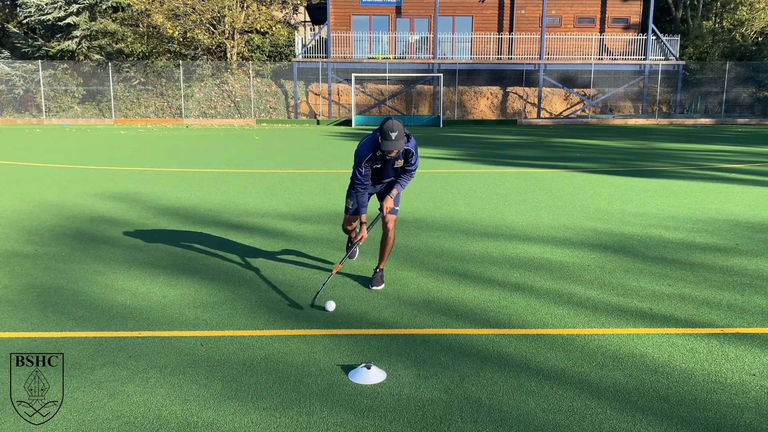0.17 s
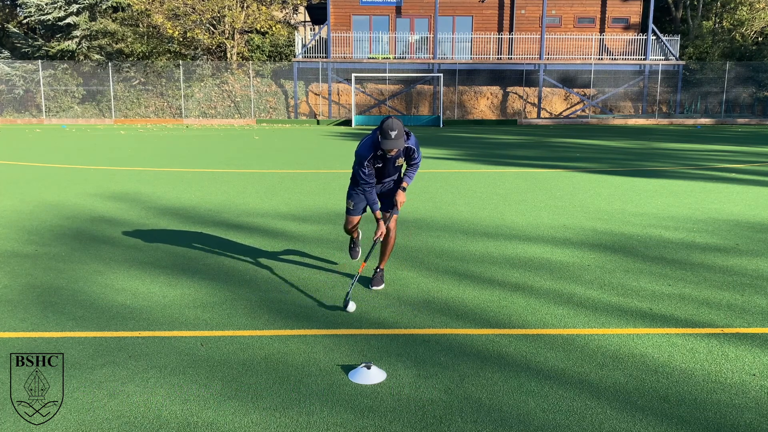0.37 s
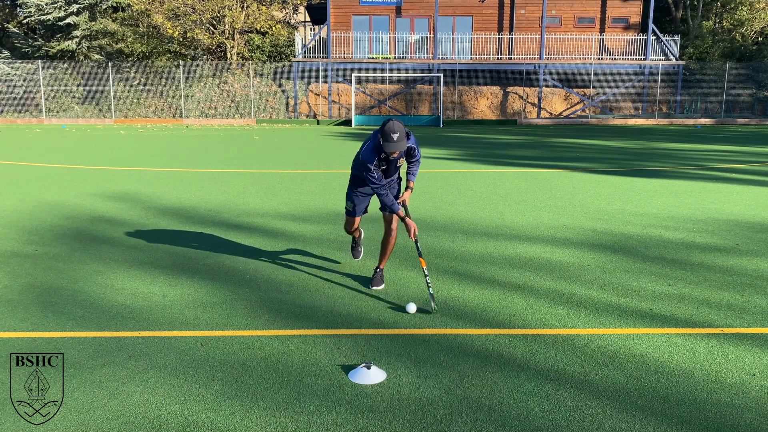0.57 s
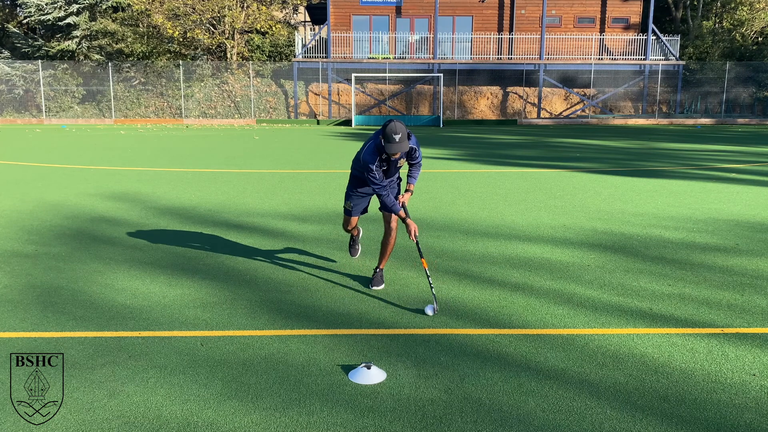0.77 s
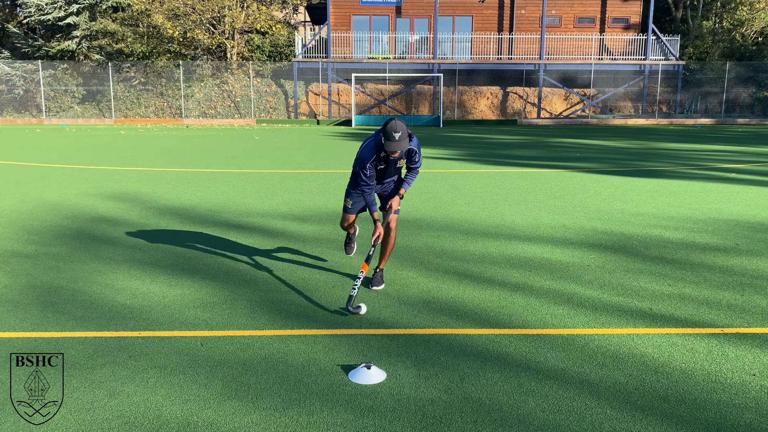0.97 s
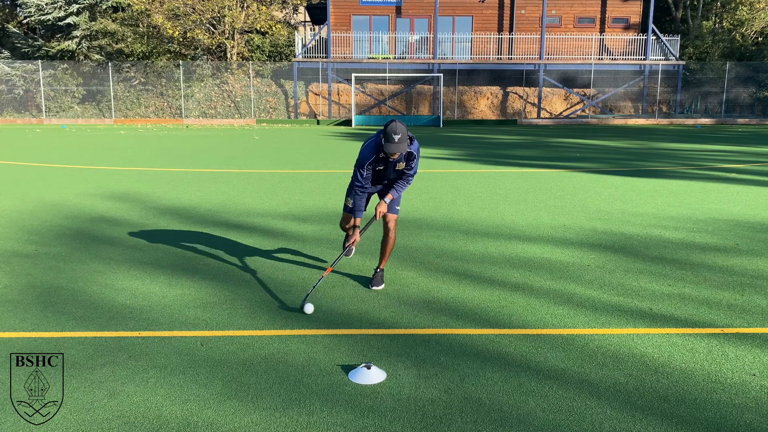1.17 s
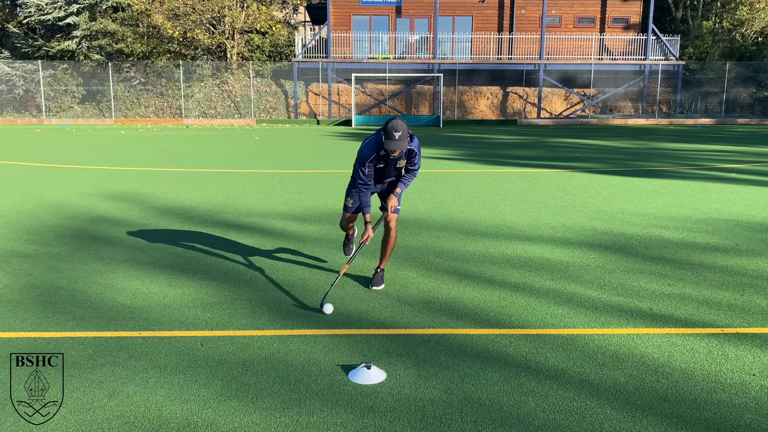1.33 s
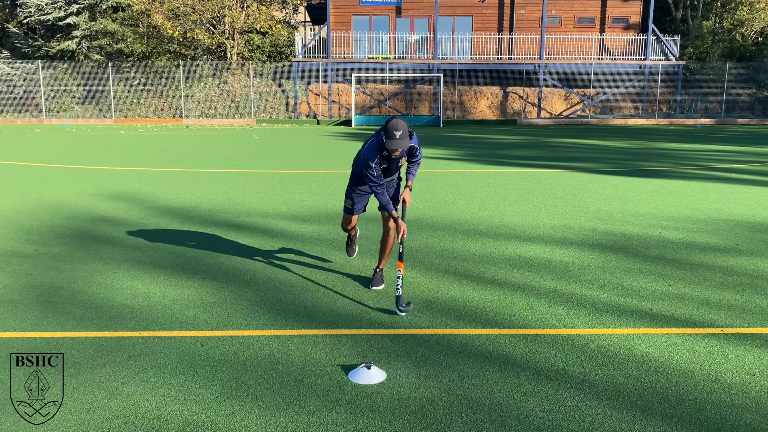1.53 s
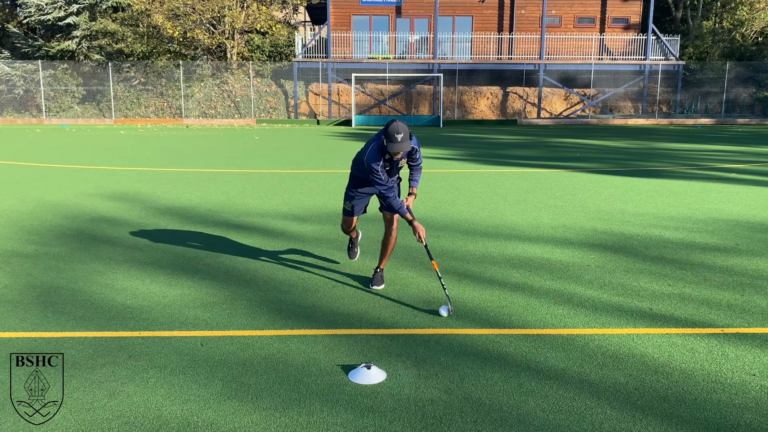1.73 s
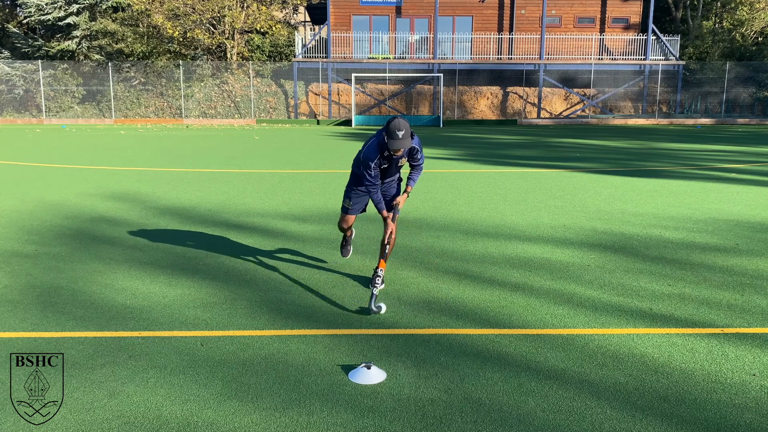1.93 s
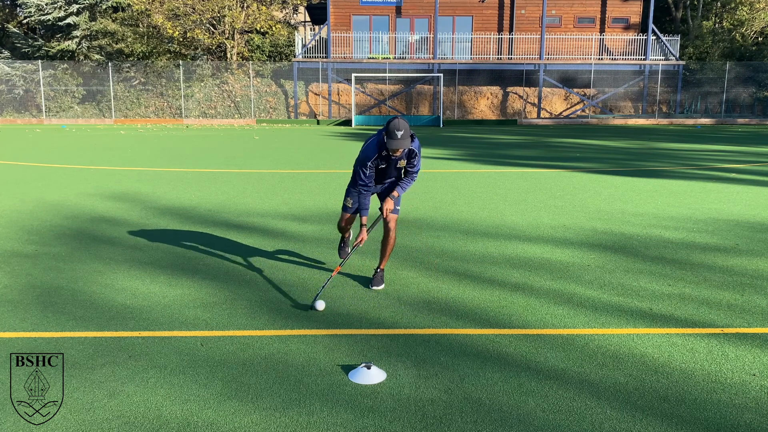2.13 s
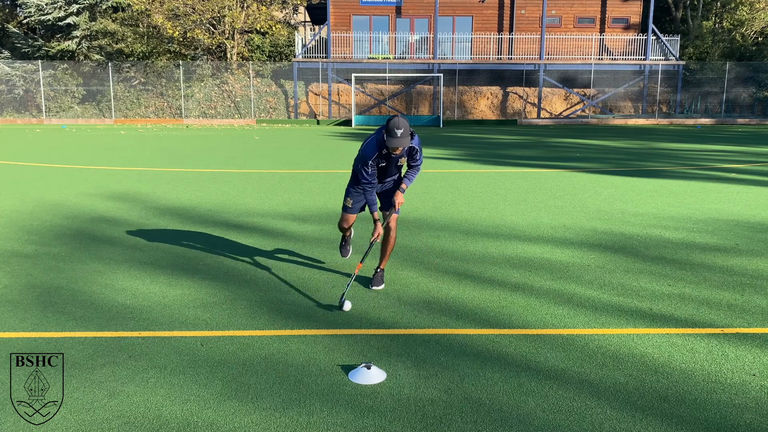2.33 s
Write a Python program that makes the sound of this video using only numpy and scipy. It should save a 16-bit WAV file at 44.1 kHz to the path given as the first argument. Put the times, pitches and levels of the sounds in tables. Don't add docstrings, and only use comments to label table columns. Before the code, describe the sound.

Short, dry wooden knocks on a hard ball, alternating with quieter ticks and thuds and brief turf brushing, heard by a phone a few metres away on an open pitch, with slap echoes and a faint steady hum.

```python
import sys
import numpy as np
from scipy import signal
from scipy.fft import rfft, irfft
from scipy.io import wavfile
from scipy.ndimage import uniform_filter1d

SR = 44100
rng = np.random.default_rng(int(sys.argv[2]) if len(sys.argv) > 2 else 0)


def voltage_ratio(decibels):
    exponent = np.asarray(decibels, float) / 20
    return 10 ** exponent


def unload_audio(sound):
    columns = np.transpose(np.atleast_2d(sound))
    steps = np.round(np.clip(columns, -1, 1) * 32767)
    wavfile.write(sys.argv[1], SR, steps.astype(np.int16))


N = 110250
T = np.arange(N) / SR
F = np.fft.rfftfreq(N, 1 / SR) + 1e-3

# pitch_hz, level_db_per_hz
TRAFFIC_COLOUR = [(30, -4), (60, -3), (200, -7.5), (550, -13.5), (1400, -10.5), (2750, -46), (7000, -55.5),
                  (16000, -72)]
# pitch_hz, likeness_0_to_1
EAR_LIKENESS = [(60, 0.9), (130, 0.57), (290, 0.55), (640, 0), (1410, 0), (3100, 0), (6820, -0.01),
                (15000, 1)]
# pitch_hz, level_db, wobble_db
HUMS = [(58, -56.5, 3.5), (546, -62.5, .8)]
# time_s, level_db
HISS_LEVEL = [(0.0, -88), (0.2, -94), (0.26, -80), (0.4, -71.5), (0.55, -84.5), (0.62, -105),
              (0.7, -79.5), (0.95, -78), (1.07, -86), (1.17, -98), (1.24, -79), (1.5, -74.5), (1.64, -89),
              (1.74, -79), (2.02, -80.5), (2.14, -97), (2.24, -76), (2.5, -83)]
# pitch_hz, width_hz, level_db
HISS_BANDS = [(10600, 2800, 5), (15000, 1400, 0.5)]
# time_s, level_db
BRUSH_LEVEL = [(0, -59), (.15, -70), (.29, -70.5), (.33, -51), (.6, -83), (.82, -66), (.85, -48.5),
               (1.0, -65), (1.13, -91), (1.44, -71), (1.48, -48.5), (1.58, -53), (1.75, -71.5),
               (1.9, -78.5), (2.1, -68.5), (2.15, -54), (2.3, -70), (2.5, -86)]
# pitch_hz, level_db_per_hz
FIBRE_COLOUR = [(400, -30), (900, -3.5), (1800, 2.5), (2800, -1.5), (5000, -2), (7300, -8), (8300, -27.5),
                (16000, -43)]
# start_s, peak_db, pitch_hz, decay_60db_s
SMALL_RINGS = [(.016, -48.5, 2060, 0.046), (.043, -43.5, 2020, 0.057), (.065, -43.5, 2200, 0.021),
               (.2505, -31, 1260, .008), (.296, -42, 1400, 0.0076), (.337, -21, 1030, 0.0065),
               (.407, -26, 1130, 0.0079), (.788, -32, 2240, 0.0077), (.908, -37, 1300, .01),
               (1.4785, -28, 3500, 0.0035), (1.4785, -29, 6400, 0.0039), (2.139, -27, 2250, 0.005),
               (2.139, -29, 3570, 0.0046), (2.3, -38, 1500, .004), (1.3855, -29, 860, 0.011),
               (1.4035, -39, 5900, .004), (.7645, -21, 2000, 0.0066), (.227, -27, 1700, .012),
               (.2955, -30.5, 800, 0.0099), (.945, -30, 1410, .005), (.9555, -36, 2400, 0.0048),
               (0.295, -28, 1000, 0.011), (.836, -30, 1170, 0.014), (.881, -35, 1270, 0.024),
               (2.0478, -34, 1380, 0.012), (1.529, -32.5, 1550, 0.033), (1.557, -32.5, 1700, 0.01),
               (1.566, -35.5, 1650, 0.02), (1.3845, -23.5, 1330, 0.017), (2.065, -33, 1450, 0.023),
               (2.052, -42, 2040, 0.085), (2.150, -28.5, 1920, 0.02), (2.192, -36, 2020, 0.064),
               (2.150, -40.5, 2020, 0.15), (2.228, -37, 1060, 0.02), (2.265, -48.5, 2020, 0.054)]
# start_s, peak_db, centre_hz, length_s
TURF_SCUFFS = [(0.042, -40, 1930, 0.0071), (0.946, -29.5, 2790, 0.0094), (1.404, -26.5, 2260, 0.0065),
               (1.405, -27.5, 4300, 0.0024), (1.452, -36, 2986, 0.0077), (1.469, -29.5, 3735, 0.0025),
               (1.4775, -20.5, 3670, 0.0022), (1.469, -30.5, 6600, 0.0026), (2.113, -40, 5800, 0.0025),
               (1.452, -39, 7000, .004), (1.527, -20.5, 1600, 0.0023), (1.530, -24, 3500, 0.013),
               (1.555, -25, 1900, .004), (1.564, -30.5, 1670, 0.0048), (1.842, -46, 3500, 0.01),
               (2.0465, -20.5, 3500, 0.0021), (2.05, -31.5, 580, 0.031), (1.614, -37, 800, 0.0036),
               (2.111, -35, 2860, 0.0042), (2.130, -30, 3600, 0.00098), (2.137, -26, 2830, 0.0015),
               (2.152, -32, 1500, 0.00075), (2.191, -26, 1370, 0.0047)]
# start_s, peak_db, shaft_hz, tick_db, thud_db
LIGHT_TOUCHES = [
    (0.1734, -23.5, 800, -21.5, -2.5),
    (0.6604, -20, 770, -20, -8.5),
    (1.111, -22, 860, -27.5, -10.5),
    (1.614, -36, 790, -18.5, 1.5),
    (2.088, -26, 905, -28, -11),
]
# thud_decay_60db_s, crunch_db, crunch_hz, tap_db
TOUCH_GRIPS = [(0.015, 2, 2870, 1.5), (0.025, .3, 1980, 2.5), (0.019, -0.4, 2250, -5), (0.017, -2, 1900, 2),
               (0.017, 2.3, 2600, -0.5)]
# pitch_hz, level_db, decay_60db_s
TICK_MODES = [(7260, -15, 0.0011), (11000, 4, 0.0011), (15500, -5.5, 0.0027)]
# start_s, peak_db, body_tilt_db, ball_ring_db, sharp_edge_db
HARD_KNOCKS = [
    (.222, 0.5, -1, -17, -31),
    (0.2322, -22.5, -8, -16, -46),
    (0.235, -38, -13, -9, -36),
    (.762, 0, 5.5, -20, -41),
    (.770, -24, 3, -21, -52),
    (.774, -33, -9.5, -15, -60),
    (1.3814, -7.5, -0.5, -23, -67),
    (2.046, -18, -4.5, -30, -61),
]
# middle_body_mode_db, body_pitch_ratio, ball_pitch_ratio, thump_db, edge_pitch_ratio
KNOCK_PLACES = [(5, 1.029, 1.045, 1.5, 1.02), (4, 1.02, 1.05, 1, 1.04), (8, 1.01, 0.93, 0.5, 1.01),
                (1, 1.044, 1.007, -1, 1.14), (6, 0.89, 1.2, 1, 1.1), (7, 0.96, 0.96, .3, 1.1),
                (1.5, 1.01, 1.035, 3.5, 1.1), (1, 0.965, 0.82, 1, 1.01)]
# pitch_hz, level_db, decay_60db_s
WOOD_MODES = [(1044, -3.5, 0.0037), (1446, -2.5, 0.0037), (1995, -4, 0.0046)]
# pitch_hz, level_db, decay_60db_s
BALL_MODES = [(3500, -10.5, 0.00274), (4560, 5, 0.0016), (6370, -1, 0.0023)]
# pitch_hz, level_db, decay_60db_s
EDGE_MODES = [(10270, -5.5, 0.002), (12400, -22, 0.00088), (15040, -23, 0.0018)]
# delay_s, slap_db, scatter_db, spread_s
WALL_ECHOES = [(0.072, -26, -31, 0.0037), (.092, -50, -33.5, .004), (.115, -28, -30, .012),
               (0.167, -20, -40.5, .003), (.176, -24.5, -31, .003), (.185, -24.5, -30.5, .006)]
# pitch_hz, level_db
ECHO_COLOUR = [(400, 5), (1000, -1), (2000, -2), (3300, 4.5), (5000, -0.5), (8000, 2)]
# pitch_hz, difference_db
PORT_LEVEL = [(200, 0), (700, -1), (1400, .5), (2800, 2), (5600, 7), (9000, 1.5), (14000, 0)]
# pitch_hz, phase_rad
PORT_TURN = [(300, .5), (1500, .4), (2700, .4), (5000, .5), (9000, .35), (12500, 2), (16000, 2.2)]
# pitch_hz, level_db
MIC_COLOUR = [(22, -16), (45, 3), (7600, -0.5), (9100, -9.5), (10500, -3), (12300, -3.5), (13400, -10),
              (15000, -2.5), (15800, -10), (16500, -9)]


def read(table, hz):
    pitch, value = np.array(table).T[:2]
    return np.interp(np.log(hz), np.log(pitch), value)


def follow(table):
    return np.interp(T, *np.array(table).T)


def unit(x):
    return x / np.sqrt(np.mean(x ** 2))


def band(x, hz, width):
    return signal.lfilter(*signal.iirpeak(hz, hz / width, fs=SR), x)


def butter(x, order, hz, kind="low"):
    return signal.sosfilt(signal.butter(order, hz, kind, fs=SR, output="sos"), x)


def walk(rate):
    hold = int(SR / rate)
    steps = np.repeat(rng.standard_normal(N // hold + 1), hold)
    return 1.056 * uniform_filter1d(uniform_filter1d(steps, hold), hold)[:N]


def ring(t, hz, t60):
    contact_cycles = 0.96
    t = np.maximum(t, 0)
    push = 1 - np.exp(-(t * hz / contact_cycles) ** 2)
    return push * np.sin(2 * np.pi * hz * t) * voltage_ratio(-60 * t / t60)


def chord(t, modes, ratio=1):
    return sum(voltage_ratio(db) * ring(t, hz * ratio, t60) for hz, db, t60 in modes)


def burst(t, hz, width, t60):
    noise, grain = rng.standard_normal((2, SR // 10))[:, :len(t)]
    gain = np.std(band(band(noise, hz, width), hz, width))
    fading = noise * grain * voltage_ratio(-60 * np.abs(t) / t60) * (t > 0)
    return band(band(fading, hz, width), hz, width) / gain


def add(out, at, shape):
    i = int(at * SR)
    part = out[i:i + SR // 10]
    part += shape(T[i:i + len(part)] - at)


def town():
    traffic_db = -44.5
    traffic, swell = 0, walk(0.85)
    for hz in 32 * 2 ** np.arange(0, 9.1, .5):
        width = hz / 1.77
        like = np.sqrt(np.clip(read(EAR_LIKENESS, hz), 0, .99))
        mid, side = (unit(band(band(rng.standard_normal(N), hz, width), hz, width)) for _ in range(2))
        db = read(TRAFFIC_COLOUR, hz) + 10 * np.log10(hz) + 1.8 * swell + 0.68 * walk(4.3)
        ears = np.sqrt(1 + like) * mid + np.sqrt(1 - like) * side * np.array([[1], [-1]])
        traffic = traffic + voltage_ratio(db) * ears
    hum = 0
    for hz, db, wobble_db in HUMS:
        level = voltage_ratio(db - 1 + wobble_db * walk(6.92))
        drifting_hz = hz + 1.45 * walk(6.46)
        hum = hum + level * np.sin(2 * np.pi * np.cumsum(drifting_hz) / SR)
    return unit(traffic) * voltage_ratio(traffic_db - 5.0) + hum


def high_hiss():
    noise = rng.standard_normal((2, N))
    airy = 0
    for hz, width, db in HISS_BANDS:
        part = butter(noise, 3, [hz - width / 2, hz + width / 2], "band")
        airy = airy + voltage_ratio(db) * part * np.sqrt(SR / 2 / width)
    return airy * voltage_ratio(follow(HISS_LEVEL) + 1.43 * walk(17))


def brush():
    brush_db, grains_per_s, scatter_db = -6, 3800, 1
    chance, height, size = rng.random((3, N))
    clicks = (chance < grains_per_s / SR) * (height - .5) * voltage_ratio(-scatter_db * np.log(size + 1e-9))
    rough = unit(clicks) + 1.9 * rng.standard_normal(N)
    hiss = irfft(rfft(rough) * voltage_ratio(read(FIBRE_COLOUR, F)), N)
    hiss /= np.std(band(hiss, 5900, 3400))
    return hiss * voltage_ratio(follow(BRUSH_LEVEL) + brush_db + 1.5 * walk(36.0))


def rings():
    out = np.zeros(N)
    for at, db, hz, t60 in SMALL_RINGS:
        add(out, at, lambda t: voltage_ratio(db) * (ring(t, hz, t60) + 1.1 * ring(t, hz * 0.886, t60 * 0.3)))
    return out


def scuffs():
    gain_db, hiss_db = -0.5, -21
    out = np.zeros(N)
    for at, db, hz, length in TURF_SCUFFS:
        t60 = 5 * max(length, .001)

        def scrape(t):
            body = 0.24 * burst(t, hz, hz / 1.23, t60)
            hiss = voltage_ratio(hiss_db) * burst(t, 2280, 2000, t60)
            return voltage_ratio(db + gain_db) * (body + hiss)
        add(out, at, scrape)
    return out


def touches():
    touch_gain_db, tick_gain_db = 2.5, 18.5
    tap_hz, tap_gain_db, tap_t60_s = 1500, 5.5, 0.0033
    crunch_gain_db, crunch_s = -16, 0.0032
    out = np.zeros(N)
    for (at, db, hz, tick_db, thud_db), grip in zip(LIGHT_TOUCHES, TOUCH_GRIPS):
        thud_t60, crunch_db, crunch_hz, tap_db = grip

        def touch(t):
            tap = -voltage_ratio(tap_gain_db + tap_db) * ring(t, tap_hz, tap_t60_s)
            thud = 0.75 * ring(t - .0025, hz, thud_t60) + 0.4 * burst(t - .002, hz, 740, 0.028)
            tick = chord(t - .0005, TICK_MODES) + 0.09 * burst(t, 9100, 5500, 0.017)
            crunch = voltage_ratio(crunch_gain_db + crunch_db) * burst(t, crunch_hz, 1320, crunch_s * 5)
            hit = tap + voltage_ratio(thud_db) * thud + voltage_ratio(tick_db + tick_gain_db) * tick + crunch
            return voltage_ratio(db + touch_gain_db) * hit
        add(out, at, touch)
    return out


def knocks():
    knock_gain_db, ball_gain_db, edge_gain_db = 6.5, 7, 20.5
    thump_hz, thump_gain_db, thump_t60_s = 612, -9.5, 0.0043
    rattle_db, rattle_t60_s = -29, 0.028
    ball_late_s, wood_top_hz = 0.000338, 2565
    wood, ball = np.zeros(N), np.zeros(N)
    for (at, db, tilt_db, ball_db, edge_db), place in zip(HARD_KNOCKS, KNOCK_PLACES):
        mid_db, pitch, bright, thump_db, sharp = place
        level = voltage_ratio(db + knock_gain_db)

        def wooden(t):
            body = 0
            for k, (hz, mode_db, t60) in enumerate(WOOD_MODES):
                mode_db = mode_db + (k - 1.5) * tilt_db + (k == 1) * mid_db
                body = body + (-1) ** k * voltage_ratio(mode_db) * ring(t, hz * pitch, t60)
            return level * (body - voltage_ratio(thump_gain_db + thump_db) * ring(t, thump_hz, thump_t60_s))

        def hard(t):
            late = t - ball_late_s
            tone = voltage_ratio(ball_db + ball_gain_db) * chord(late, BALL_MODES, bright)
            edge = voltage_ratio(edge_db + edge_gain_db) * chord(late, EDGE_MODES, sharp)
            rattle = burst(t, 1390, 2720, rattle_t60_s) + 0.12 * burst(t, 4800, 5000, 0.019)
            return level * (tone + edge + voltage_ratio(rattle_db) * rattle)
        add(wood, at, wooden)
        add(ball, at, hard)
    return butter(wood, 3, wood_top_hz) + ball


def yard(x):
    slap_top_hz, echo_top_hz = 2400, 6500
    tail_start_s, tail_rise_s, tail_t60_s, tail_db = 0.084, 0.074, 0.73, -16.5
    t = T[:SR // 2]
    wake_noise, tail_noise = rng.standard_normal((2, 2, len(t)))
    slaps, wakes = np.zeros(len(t)), np.zeros(len(t))
    for delay, slap_db, scatter_db, spread in WALL_ECHOES:
        slaps[int(delay * SR)] += voltage_ratio(slap_db)
        fade = np.exp(-np.maximum(t - delay, 0) / spread) * (t >= delay)
        wakes += voltage_ratio(scatter_db) * fade / np.sqrt(spread * SR / 2)
    slaps = butter(slaps, 2, slap_top_hz)
    scattered = wakes * (wake_noise[0] + 0.93 * wake_noise)
    tail = np.clip((t - tail_start_s) / tail_rise_s, 0, 1) * voltage_ratio(-60 * t / tail_t60_s)
    response = slaps + scattered + voltage_ratio(tail_db) * tail * tail_noise / np.sqrt(np.sum(tail ** 2))
    wet = signal.fftconvolve(x[None], response, axes=1)[:, :N]
    wet = irfft(rfft(wet) * voltage_ratio(read(ECHO_COLOUR, F)), N)
    return butter(wet, 2, echo_top_hz)


def ports(x):
    turn = voltage_ratio(read(PORT_LEVEL, F) / 2) * np.exp(.5j * read(PORT_TURN, F))
    return irfft(rfft(x) * np.array([turn, 1 / turn]), N)


def scene():
    surroundings = town() + high_hiss()
    brushing = brush()
    small = rings() + scuffs() + touches()
    hits = butter(knocks(), 2, 250, "high")
    return ports(hits + small + brushing) + yard(hits + small) + surroundings


def top_cut(x):
    return signal.sosfilt(signal.butter(12, 16770, fs=SR, output="sos"), x)


def record(dry):
    bass_lag_s, lag_hz, top_hz = 0.0013, 1500, 16600
    lag = 2 * np.pi * bass_lag_s * lag_hz * np.log(1 + F / lag_hz)
    colour = voltage_ratio(read(MIC_COLOUR, F)) * (F < top_hz) * np.exp(-1j * lag)
    return top_cut(irfft(rfft(dry) * colour, N))


dry = scene()
out = record(dry)
unload_audio(out)
```